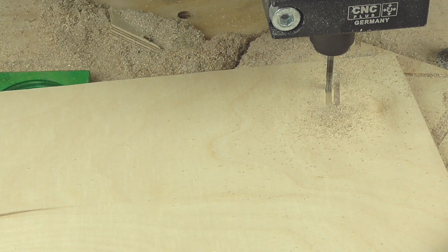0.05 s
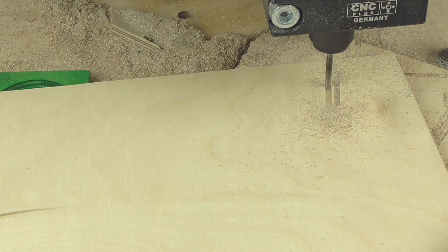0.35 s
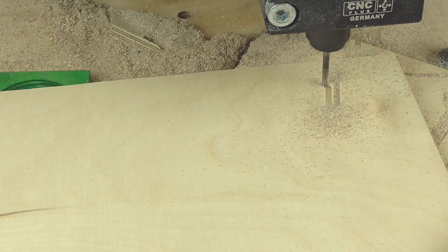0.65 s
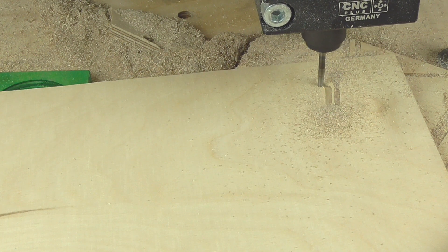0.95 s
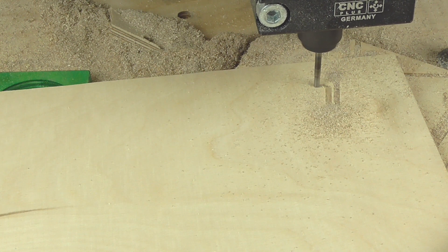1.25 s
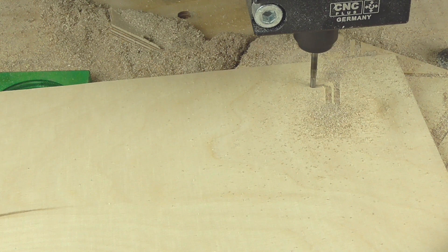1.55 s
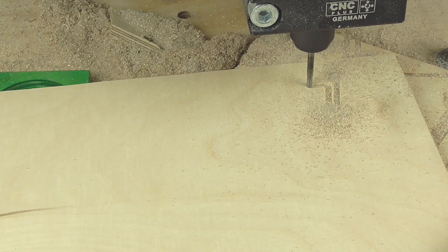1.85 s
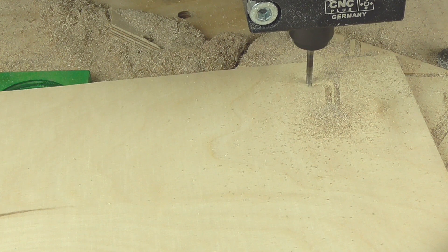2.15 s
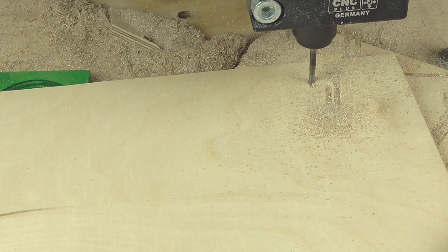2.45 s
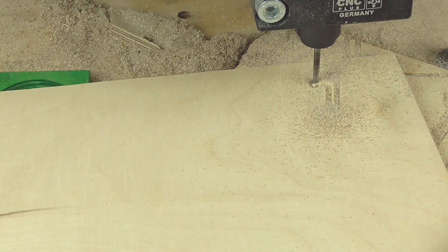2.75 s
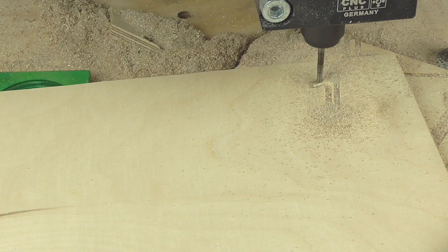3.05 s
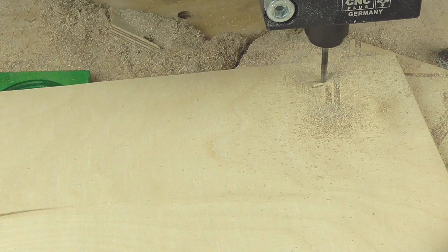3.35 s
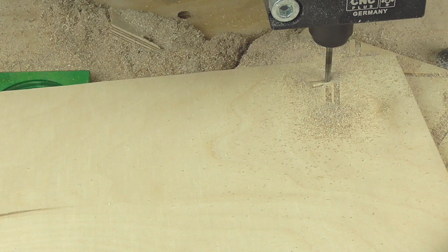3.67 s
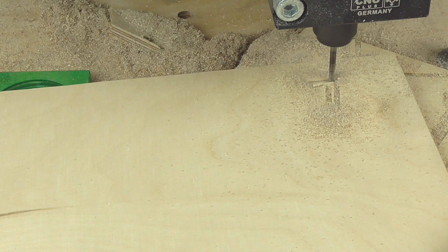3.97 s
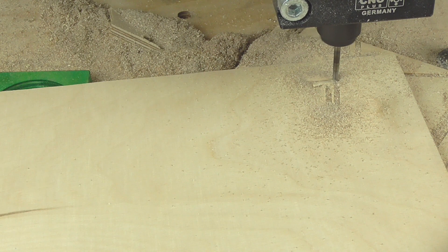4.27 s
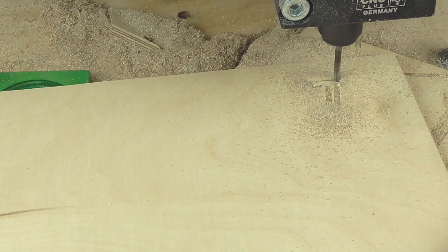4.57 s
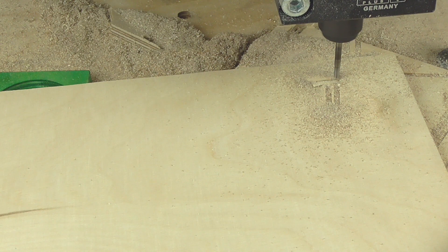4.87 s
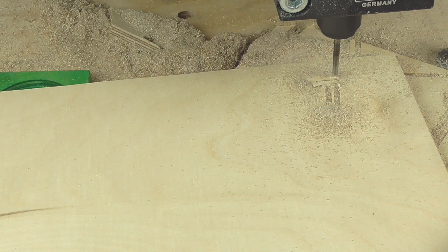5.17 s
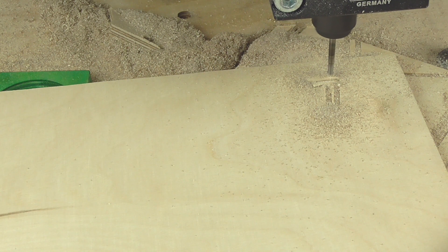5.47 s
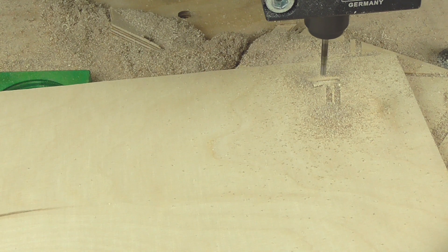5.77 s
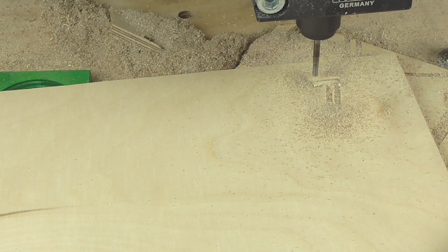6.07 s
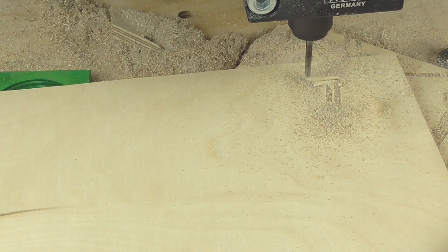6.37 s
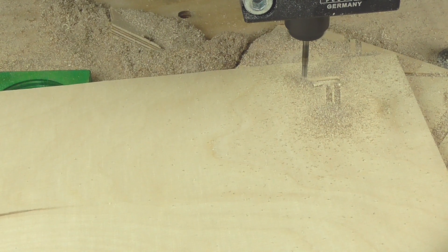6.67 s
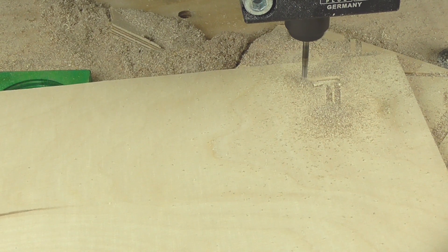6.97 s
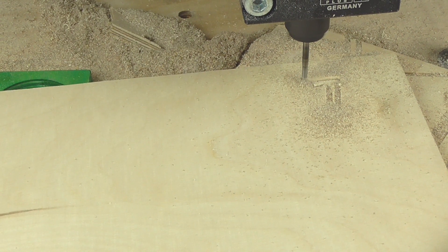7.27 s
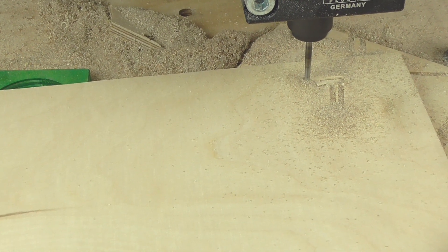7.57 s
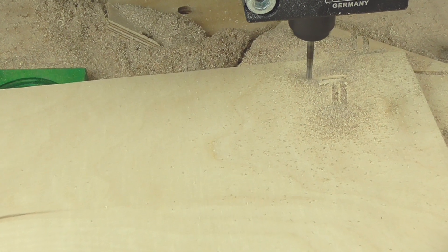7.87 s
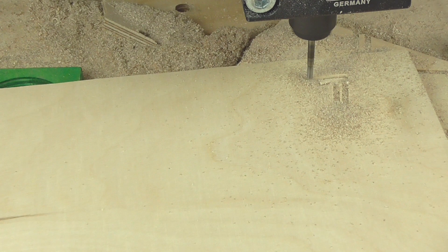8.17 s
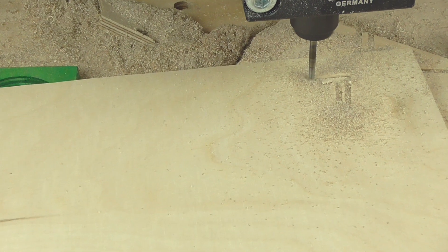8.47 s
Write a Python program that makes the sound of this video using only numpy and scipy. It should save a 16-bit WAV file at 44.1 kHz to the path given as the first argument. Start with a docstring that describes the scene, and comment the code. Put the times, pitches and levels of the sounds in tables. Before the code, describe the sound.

A milling machine squeals through plywood, then settles into a coarse, hissing roar over a motor hum and thin whine.

```python
"""A router bit chatters in plywood: friction against the groove wall excites a squeal with overtones,
modulated once a turn into rows of side tones. The spindle, at about 390 turns a second, hums through
its unbalance and beats against its drive. After four seconds the bit goes deeper and the squeal dies;
the sheet, in forced vibration, roars under a hiss of chips and a thin motor whine.
The machine frame drones faintly behind."""
import sys
import numpy as np
from scipy import signal
from scipy.fft import rfft, irfft, next_fast_len
from scipy.io import wavfile
from scipy.ndimage import uniform_filter1d

SR = 44100
rng = np.random.default_rng(int(sys.argv[2]) if len(sys.argv) > 2 else 0)


def unload_wav(signal):
    """Save mono or channel-first audio to the path in sys.argv[1] as 16-bit WAV at rate SR, clipped to [-1, 1]."""
    wavfile.write(
        sys.argv[1],
        SR,
        np.round(np.clip(np.atleast_2d(signal).T, -1, 1) * 32767).astype(np.int16),
    )


N = 376165
TIME = np.arange(N) / SR
DEEPER_S = 3.93  # the bit starts to go deeper


def squeal(turn, heading, across, load_db, ragged, overtone_db):
    """Modulation: the bit rings against the wall once a turn, so side tones lie one turn rate apart."""
    # one list per overtone, one row per side tone, from one turn rate below the overtone upward:
    # relative level/dB heading left, across, right; pan/dB
    partials = [
        [(-55, -52.5, -55, 4), (-41.5, -43, -45, -0.5), (-55, -53.5, -48.5, -2), (-51, -47, -56.5, 11),
         (-54.5, -64, -58.5, 2), (-67, -62, -64, -9)],
        [(-74, -86, -70, 3), (-59, -76, -65, 3), (-54.5, -51.5, -67, -15), (-50, -49.5, -56, 32),
         (-46, -47.5, -52, -14.5), (-53, -53, -47, -8), (-73, -79, -59.5, 20), (-65, -68, -76, -7),
         (-62, -57, -67, 5)],
        [(-57, -56, -64, 11), (-53, -67, -50, 10), (-48.5, -48.5, -48, -9), (-48.5, -52, -76, -17),
         (-53, -53, -64, 25), (-54, -58, -61, 19), (-69, -65, -61, 0), (-61, -64, -68, -1), (-61, -69, -72, 0)],
    ]
    ring_hz = 3460 + 9 * across + 1.56 * load_db  # higher when pressed sideways and under load
    drift_hz = 2.5 * walk(3)  # the grain of the wood changes
    ring = angle(ring_hz + drift_hz + .6 * walk(25) + 10 * ragged * walk(170))
    stutter_db = (.3 + 2.2 * ragged) * walk(90)
    # period doubling: a ragged bit bites harder on every other turn
    limp = 1 + .8 * ragged ** 2 * np.cos(turn / 2 + .9 * walk(25))
    heading_shares = np.maximum(1 - np.abs(heading - np.arange(3)[:, None]), 0)
    lean_db = side_lean()
    out = 0
    for multiple, rows in enumerate(partials, 1):
        family_db = overtone_db[multiple - 1] + stutter_db + 0.52 * walk(14)
        for side, (*heading_db, pan_db) in enumerate(rows, -1):
            db = np.dot(heading_db, heading_shares) + family_db + 0.97 * walk(5.22)
            if multiple == 1:
                db += (min(side, 2) - 0.37) * lean_db
            # side tones stay roughly in phase, so each overtone pulses once a turn
            out += tone(multiple * ring + side * turn, db, pan_db, lead=.7 * (-1) ** side, scatter=1.05)
    return out * limp


def grip(across):
    """Self-excitation: the bit rattles, locks into a squeal and lets go, upper overtones first."""
    # start/s, length/s, attack/s, release/s, raggedness (0-1), relative level/dB of overtones 1, 2, 3
    squeals = [(-.1, 0.71, .05, .16, 0.36, 0.6, -3.6, -8.5), (.595, 0.066, 0.017, .02, 0.63, -2, -1, -5),
               (0.701, 1.3, 0.066, 0.043, .04, 0.65, -2.5, 1.1), (2.116, 2.04, 0.29, 0.26, 0.12, 1.4, 4, 0),
               (4.33, 0.14, 0.052, .02, 0.45, -1, -13, -8), (4.463, 0.043, .012, .012, .4, 0.5, -1, -3),
               (4.518, .075, .012, 0.057, .2, 3.5, 4.5, -5)]
    # per overtone: relative level when loose/dB, lift heading across/dB, sag in a squeal/(dB/s)
    overtones = [(-5, -2.5, 1.03), (-6, 3.5, 0), (-6.5, 5.5, 1.5)]
    loose_db, across_db, sag_rate = np.transpose(overtones)[..., None]
    held, ragged, gains = 0, 1, 0
    for start, length, attack, release, roughness, *squeal_db in squeals:
        age = TIME - start
        hold = np.clip(np.minimum(age / attack, (length - age) / release), 0, 1)
        envelopes = np.array([hold, hold ** 3, hold ** 3])
        gains += envelopes * undb(np.array(squeal_db)[:, None] - sag_rate * np.clip(age, 0, length))
        held += hold
        ragged -= hold * (1 - roughness)
    rattle = undb(loose_db - 48 * np.maximum(TIME - DEEPER_S, 0))  # the deeper cut damps it by 48 dB/s
    gains += rattle * np.maximum(1 - np.array([held, held ** 2, held ** 2]), 0)
    overtone_db = 20 * np.log10(gains + 1e-9) + across_db * across
    return np.clip(ragged, 0, 1), overtone_db


def side_lean():
    """Sideband asymmetry, in dB per side tone: upward in corners, downward in the deep cut."""
    # corners where the bit jams: t/s, half length/s, tilt/(dB per side tone)
    corners = [(.54, .1, 2.2), (.77, 0.088, 3.5), (1.94, 0.069, 2.6), (3.92, 0.11, 2.7)]
    flare_db = sum(db * np.exp(-((TIME - s) / half) ** 2) for s, half, db in corners)
    depth = np.clip((TIME - DEEPER_S) / .45, 0, 1)
    return flare_db - 1.5 * depth ** 2


def rasp(turn, overtone_db):
    """Friction noise: once a turn, a burst of chatter scrapes the groove wall."""
    # spectrum of the scrape: f/Hz, relative level/dB
    spectrum = [(2500, -36), (3400, 3), (5500, -6.5), (8000, 1), (10500, -9), (12800, 5), (15000, -5)]
    scrape = colour(grains(scatter_db=.8, grain_rate=1400, side_db=-7), spectrum)
    burst_db = 3.8 * np.cos(turn)
    return scrape * undb(np.minimum(overtone_db, 4) - 51 + burst_db)


def sheet(roar_db):
    """Forced vibration: the cutting force drives the plywood's modes; low tones come from the left."""
    # spectrum of the sheet: f/Hz, relative level/dB
    spectrum = [(30, -58), (110, -25), (160, -34), (250, -9), (350, -8), (450, 0), (680, -0.5), (820, -4.5),
                (1050, 0.5), (1300, -3), (1430, 0.5), (1750, -11.5), (2080, -4.5), (2900, -19)]
    # resonances of plywood and machine bed: f/Hz, width/Hz, lift/dB
    modes = [(672, 30, 2), (933, 21, 5), (1018, 35, 4.5), (1117, 22, 6.5), (1165, 7.3, 2.5),
             (1237, 12, 8.5), (1418, 22, 7), (2110, 35, 2.5)]
    # shading of the right side: f/Hz, relative level/dB
    shade = [(60, -7), (200, -7), (450, -6.5), (700, -3.5), (1200, -2.5), (2400, -1.0)]
    left, right = colour(grains(scatter_db=1.0, grain_rate=300, side_db=-13), spectrum, modes)
    roar = np.array([left, undb(-2.5) * colour(right, shade)])
    return roar * undb(roar_db + 2.5 + 0.5 * walk(9))


def dust(turn, load_db, overtone_db):
    """Modulated noise: edge hiss and chip spray grow with load and puff once a turn during chatter."""
    # spectrum of the edge tearing fibres: f/Hz, relative level/dB
    edge_spectrum = [(1000, -27.5), (2750, -4), (3300, 6), (4300, 0.5), (5400, 1), (6600, -1.5),
                     (7500, -3.5), (8600, 5.5), (9800, 1.5), (12500, -5.5), (14200, -7), (15200, -22),
                     (16000, -10)]
    # spectrum of the flying chips: f/Hz, relative level/dB
    chip_spectrum = [(6000, -33), (9500, -14.5), (10600, -8), (11400, -1.5), (11800, -4.5), (12400, -15),
                     (16000, -36)]
    puff = np.minimum(undb(overtone_db[1]), 1) * np.cos(turn)
    fibres = grains(scatter_db=1.5, grain_rate=1500, side_db=-7)
    hiss_db = -45.5 + 0.67 * load_db
    hiss = colour(fibres, edge_spectrum) * undb(hiss_db + 3 + 0.75 * puff)
    spray = grains(scatter_db=1.5, grain_rate=1200, side_db=-9)
    chip_gain = np.hypot(undb(-43.5 + 2 * load_db), undb(-48 + 0.02 * overtone_db[2]))  # powers add
    chips = colour(spray, chip_spectrum) * chip_gain * undb(1.8 * puff)
    return (hiss + chips) * undb(.35 * walk(40))


def spindle(turn, across, load_db):
    """Beating: the hum of the rotating unbalance interferes with the slightly faster drive field."""
    # unbalance hum: t/s, relative level/dB
    unbalance = [(0.06, -38), (0.43, -36), (1.25, -43.5), (2.05, -42), (2.82, -45.5), (3.88, -41.5),
                 (4.37, -33), (4.53, -35.5), (4.95, -31.5), (5.66, -34.5), (6.22, -40), (7.04, -41),
                 (7.63, -38), (8.47, -39)]
    hum = tone(turn, curve(unbalance) + 1.02 + 0.36 * walk(25.16), pan_db=7, lead=-0.37)
    second_db = -54.5 + 0.52 * load_db + 8 * across
    hum += tone(2 * turn, second_db - 1 + 1.2 * walk(14), pan_db=8, lead=-.2)
    drive = 2 * np.pi * 400 * TIME
    torque_db = load_db - .9
    hum += tone(drive, -54 + 0.71 * torque_db, pan_db=8, lead=0.48)
    # the rectified mains shakes the torque and adds a tone 100 Hz above hum and drive
    ripple = 2 * np.pi * 100 * TIME
    hum += tone(turn + ripple, -50.5 + torque_db + 3 * walk(11), pan_db=11)
    return hum + tone(drive + ripple, -55 + torque_db, pan_db=6)


def whine(turn, load_db):
    """Rotational harmonics: motor and fan sound at multiples of the turn rate, louder under load."""
    # multiple of the turn rate, relative level/dB, pan/dB
    orders = [(3, -60.5, 13), (4, -59, -9), (5, -63.5, -14), (12, -51, -2), (13, -56.5, 7), (15, -76, 3),
              (17, -61.5, 9), (19, -57.5, 19), (22, -61, 59), (23, -64, -23), (24, -52.5, 9), (26, -83, -9)]
    shiver = walk(60)
    lift_db = 0.94 * (load_db - .9)
    out = 0
    for order, db, pan_db in orders:
        out += tone(round(order) * (turn + 0.012 * shiver), db + lift_db + 1.4 * walk(20), pan_db)
    whistle_db = -51.5 + 1.05 * load_db + 1.5 * walk(30)
    return out + tone(40 * (turn + .008 * shiver), whistle_db, pan_db=4, lead=1.2)


def gantry(across, roar_db):
    """Structure-borne sound: the frame drones with the cutting force, more when travelling across."""
    # spectrum of the frame: f/Hz, relative level/dB
    spectrum = [(25, -33), (60, -37), (100, -13), (160, -6), (203, -0.5), (225, -1), (260, 3.5), (350, -2),
                (600, -26.5)]
    drone = colour(grains(scatter_db=1.5, grain_rate=30, side_db=-10), spectrum)
    sides = undb([[2.5], [-2.5]])
    return drone * sides * (undb(-68) * across + undb(roar_db - 29))


def undb(db):
    """Amplitude ratio of a level."""
    return 10 ** (np.asarray(db) / 20)


def curve(table):
    """Linear interpolation of (t/s, value) points at every sample."""
    return np.interp(TIME, *np.transpose(table))


def unit(x):
    """Normalisation to rms 1."""
    return x / np.sqrt(np.mean(x ** 2))


def walk(rate):
    """Smooth random fluctuation through `rate` points a second; rms 1."""
    place = TIME * rate + rng.random()
    points = uniform_filter1d(rng.standard_normal(int(place[-1]) + 2), size=2)
    return unit(np.interp(place, np.arange(len(points)), points))


def angle(hz):
    """Phase as the time integral of frequency."""
    return 2 * np.pi * np.cumsum(hz) / SR


def tone(phase, db, pan_db=0, lead=0, scatter=np.pi):
    """Stereo sine of rms level `db` and random start; the left side leads by `lead` radians."""
    phase = phase + scatter * rng.uniform(-0.97, 1)
    pan_db = np.clip(pan_db, -9, 9)  # left minus right
    sides = unit(undb(np.array([[pan_db], [-pan_db]]) / 2))
    return np.sqrt(2) * undb(db) * sides * np.sin([phase + lead / 2, phase - lead / 2])


def colour(x, points, modes=()):
    """Spectral shaping by (f/Hz, level/dB) points and narrow resonances; rms 1."""
    hz, db = np.transpose(points)
    size = next_fast_len(N)
    f = np.maximum(np.arange(size // 2 + 1) * SR / size, 1)
    gain_db = np.interp(np.log(f), np.log(hz), db)
    gain_db += sum(lift / (1 + (2 * (f - centre) / width) ** 2) for centre, width, lift in modes)
    return unit(irfft(rfft(x, size) * undb(gain_db), size)[..., :N])


def grains(scatter_db, grain_rate, side_db):
    """Randomly modulated noise of tearing fibres; reflections partly decorrelate the two sides."""
    mid, side = rng.standard_normal((2, N))
    return undb(scatter_db * walk(grain_rate)) * (mid + undb(side_db) * side * np.array([[1], [-1]]))


def scene():
    """Superposition of the sources, governed by spindle speed, load, heading and the grip of the bit."""
    # turn rate of the spindle, held by the drive: t/s, f/Hz
    speed = [(0, 388.8), (.55, 389.2), (1.75, 388.6), (2.25, 389.9), (3, 388.9), (3.9, 388.7), (4.2, 390.3),
             (5.3, 390.4), (6.35, 390), (7.7, 388.6), (8.5, 388.9)]
    # cutting load, as the roar of the sheet: t/s, relative level/dB
    load = [(0.0, -45), (0.04, -46), (0.76, -45), (0.81, -48), (1.78, -48), (2.11, -44), (2.78, -51),
            (3.96, -50), (4.3, -43), (4.44, -42), (4.59, -45), (4.84, -41), (8.39, -40), (8.53, -41)]
    # path of the bit: t/s, heading (0 left, 1 across the sheet, 2 right)
    route = [(0, .6), (.35, .7), (.55, 1), (.78, 1), (.95, 0), (1.82, 0), (1.93, 1), (2.3, 1), (2.58, 2),
             (3.85, 2), (4.15, 1.35), (4.4, 1.3), (4.52, 2), (5, 2), (5.2, 0), (5.7, 0), (6.6, .6),
             (7.2, 0)]
    turn, roar_db, heading = angle(curve(speed)), curve(load), curve(route)
    load_db = roar_db + 40.5  # about 0 in the deep cut
    across = 1 - np.abs(heading - 1)
    ragged, overtone_db = grip(across)
    motor = spindle(turn, across, load_db) + whine(turn, load_db)
    chatter = squeal(turn, heading, across, load_db, ragged, overtone_db) + rasp(turn, overtone_db[2])
    cutting = sheet(roar_db) + dust(turn, load_db, overtone_db)
    return chatter + cutting + motor + gantry(across, roar_db)


def record(dry):
    """Band limiting: a steep low-pass removes the treble above 15750 Hz."""
    return signal.sosfilt(signal.ellip(10, .1, 80, 15750, fs=SR, output="sos"), dry)


dry = scene()
out = record(dry)
unload_wav(out)
```